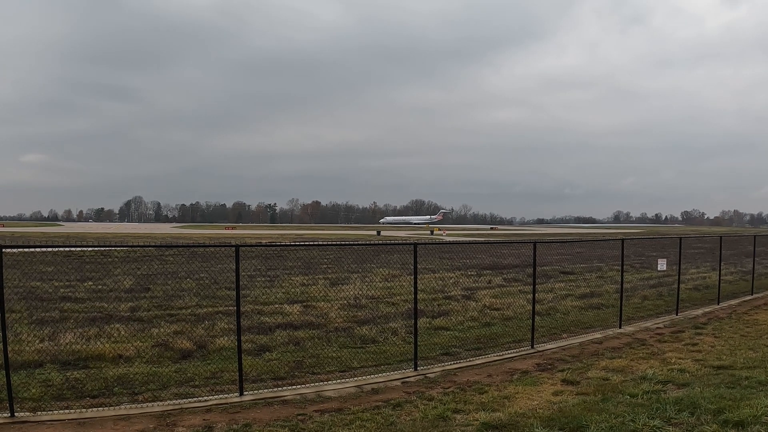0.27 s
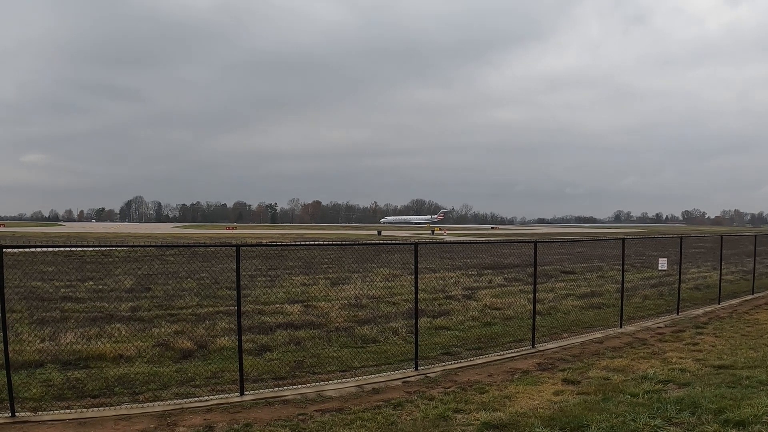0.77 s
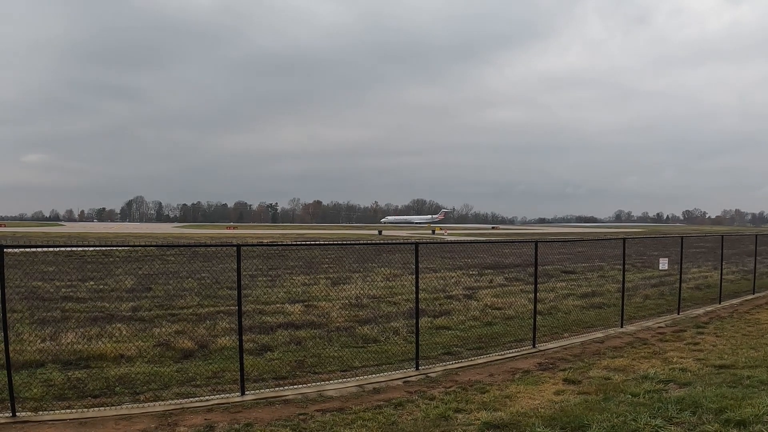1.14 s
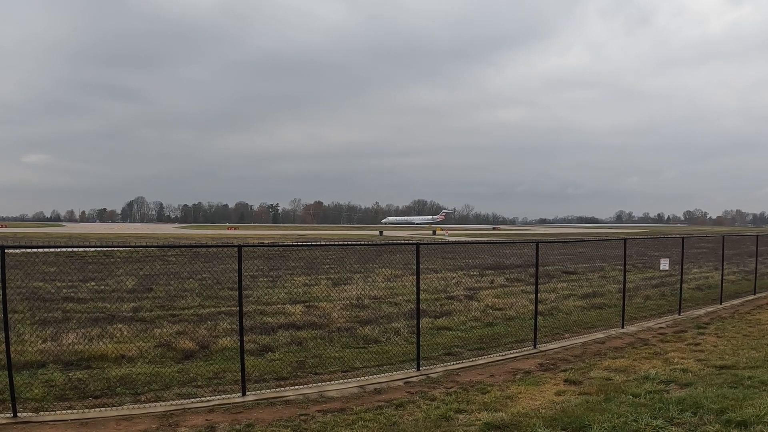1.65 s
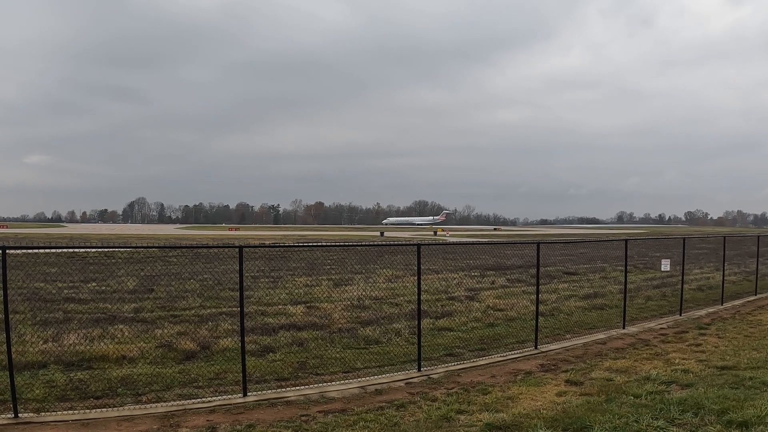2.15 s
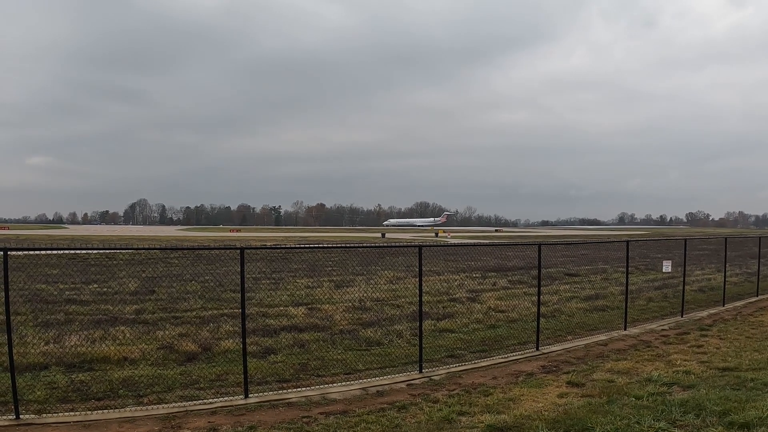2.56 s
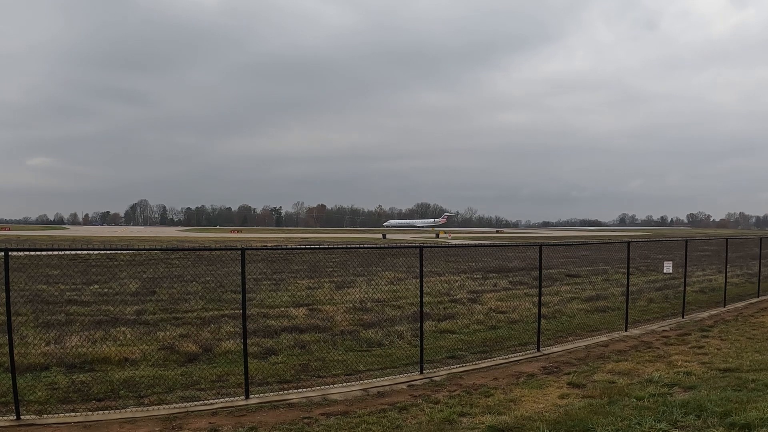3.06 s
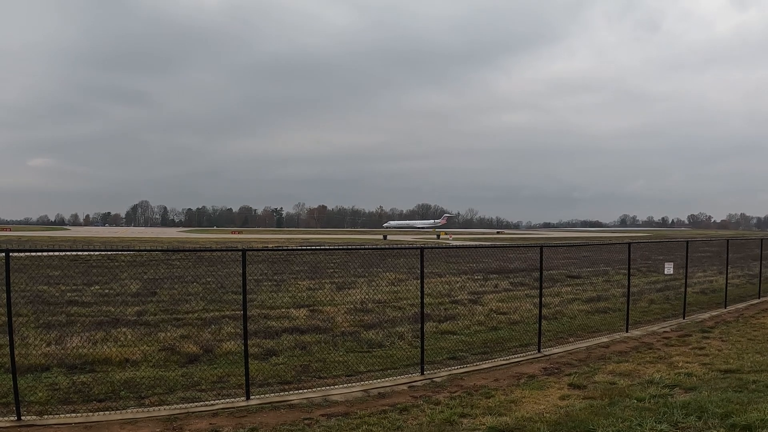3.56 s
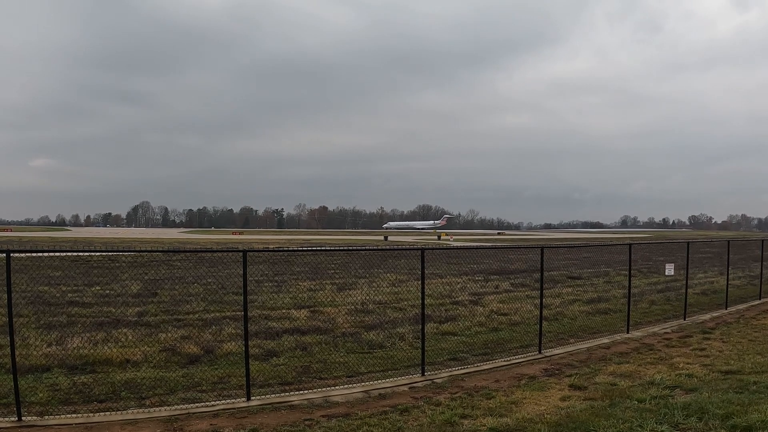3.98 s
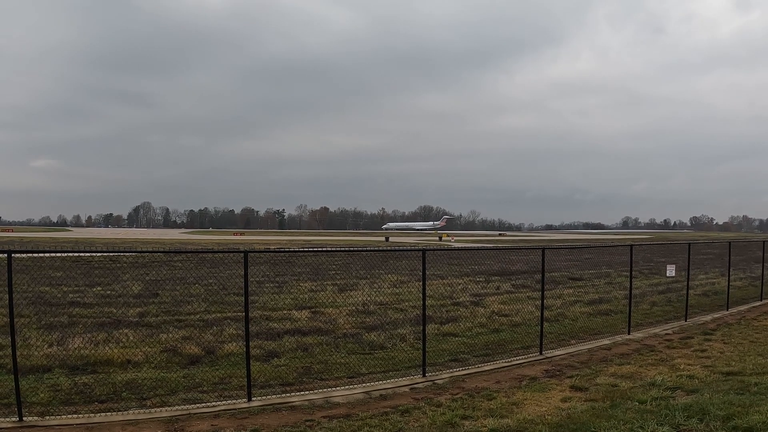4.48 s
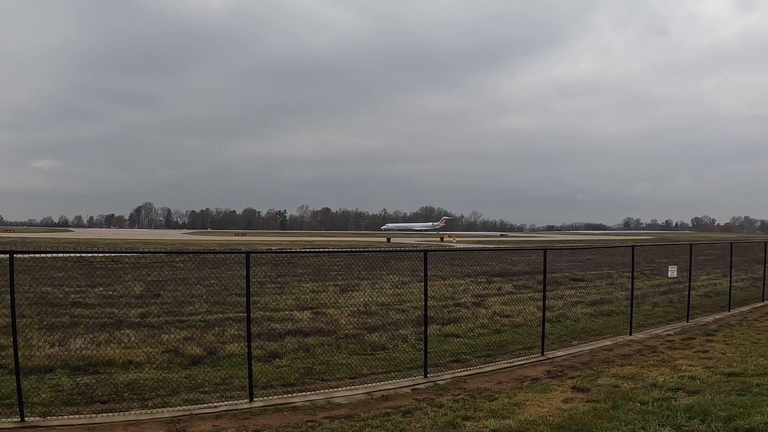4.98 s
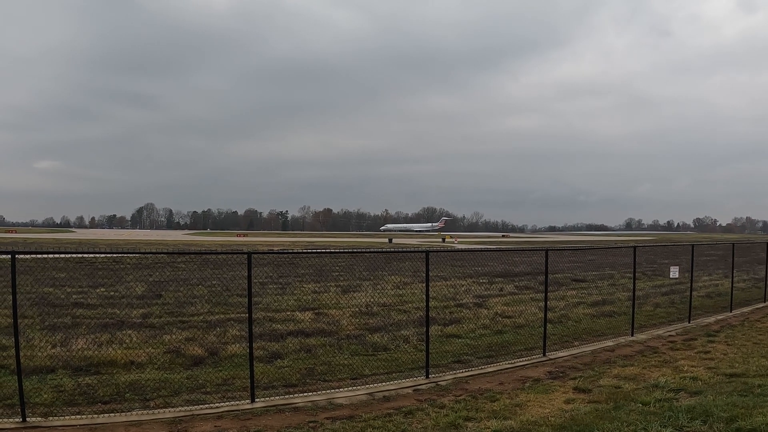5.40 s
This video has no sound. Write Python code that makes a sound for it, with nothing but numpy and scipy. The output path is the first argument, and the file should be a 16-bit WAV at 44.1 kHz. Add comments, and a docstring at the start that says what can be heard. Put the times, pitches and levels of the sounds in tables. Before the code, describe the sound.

A jet with two engines is heard from across an open field on a camera microphone in the wind. From 0 to about 2.6 seconds it idles: a fluttering, blurred whine near 1.3 kHz fades in and out over a low rumble, a broad airy rush, soft hiss and a hollow howl around 700 Hz, with a brief reedy sweep in the first half second. From about 2.7 seconds the engines spool up; the whine and its dull overtones glide upward, reaching about 2.2 kHz by 5.6, clearer and stronger, while a deep exhaust roar swells and a faint low drone rises late. Wind rumbles throughout, with soft thumps near 0.4, 0.7, 1.2, 3.9 and 4.3 seconds. After 5 seconds rough gusts batter the microphone, heavier on the right, and the near-mono image opens. It stops with engines still powering up, without any fly-past.

```python
"""Jet spooling up for takeoff

A twin-engine jet across a field goes from idle to takeoff power while wind buffets the camera microphone.
Fans: blurred harmonic lines on a rising pitch, fading in and out, over humps of wake noise.
Core, exhaust, airflow: whistle and howl, a growing low roar, shaped noise for jets, intakes and hiss.
Wind: low noise and short eddies; the image is mono until a last gust opens it."""
import sys
import numpy as np
from scipy import signal
from scipy.fft import rfft, irfft, next_fast_len
from scipy.io import wavfile
from scipy.ndimage import uniform_filter1d, map_coordinates

SR = 44100
rng = np.random.default_rng(int(sys.argv[2]) if len(sys.argv) > 2 else 0)


def bounce(signal):
    """Save signal as a 16-bit WAV file at the path given by the first command-line argument."""
    frames = np.transpose(np.atleast_2d(signal))
    limited = np.clip(frames, -1, 1)
    pcm = np.round(limited * 32767).astype(np.int16)
    wavfile.write(sys.argv[1], SR, pcm)


N = 248724


def amp(db):
    """Decibels to gain."""
    return 10 ** (np.asarray(db) / 20)


def unit(x):
    """Scale to rms 1."""
    return x / np.sqrt(np.mean(np.abs(x) ** 2) + 1e-20)


def along(points, hz):
    """Read (frequency, value) points on a log-frequency axis."""
    point_hz, values = np.transpose(points)
    return np.interp(np.log(hz + 1), np.log(point_hz + 1), values)


def curves(rows):
    """One value per sample for each column after the time."""
    times_s, *columns = np.transpose(rows)
    t_s = np.arange(N) / SR
    return [np.interp(t_s, times_s, column) for column in columns]


def wobble(knots_per_s):
    """Smooth random curve through normally distributed knots."""
    knots = rng.standard_normal(int(N * knots_per_s / SR) + 4)
    return map_coordinates(knots, [np.arange(N) * knots_per_s / SR])


def bell(time_s, length_s):
    """Smooth rise and fall of height 1 around a time."""
    return np.exp(-((np.arange(N) / SR - time_s) / length_s) ** 2)


def filtered(x, response):
    """Apply a response of frequency in the spectrum, zero-padded."""
    m = next_fast_len(N + SR // 2)
    return irfft(rfft(x, m) * response(np.fft.rfftfreq(m, 1 / SR)), m)[..., :N]


def rush(spectrum, patchy_db):
    """Coloured noise of rms 1; turbulent air gives it patches of random gain in time and frequency."""
    z = signal.stft(rng.standard_normal(N), nperseg=1024)[2]
    field = uniform_filter1d(rng.standard_normal(z.shape), size=12, axis=0)
    field = uniform_filter1d(field, size=10, axis=1)
    patchy = signal.istft(z * amp(patchy_db * unit(field)), nperseg=1024)[1][:N]
    return unit(filtered(patchy, lambda hz: amp(along(spectrum, hz))))


def steadied(x, span_s):
    """Noise with its own swells slower than the span evened out."""
    mean_square = uniform_filter1d(x ** 2, int(span_s * SR))
    mean_square = uniform_filter1d(mean_square, size=256)
    return x / np.sqrt(np.abs(mean_square) + 1e-9)


def tone(hz):
    """Sine of rms 1 on a moving pitch, random start phase."""
    return np.sqrt(2) * np.sin(2 * np.pi * (np.cumsum(hz) / SR + rng.random()))


def haystack(hz, width_hz):
    """Narrow hump of noise, rms 1: two low-passed noises modulate a moving carrier in quadrature."""
    a, b = filtered(rng.standard_normal((2, N)), lambda f: 1 / (1 + (f / width_hz) ** 2))
    phase = 2 * np.pi * np.cumsum(hz * np.ones(N)) / SR
    return unit(a * np.cos(phase) + b * np.sin(phase))


FLUTTER_DB, FLUTTER_KNOTS_PER_S = 1.3, 55


def blade_tone(hz, scatter, width_hz):
    """Fluttering line that turbulence blurs into a narrow skirt; loudness stays even."""
    share = np.clip(scatter, 0, 1)
    direct = tone(hz) * unit(amp(FLUTTER_DB * wobble(FLUTTER_KNOTS_PER_S)))
    blurred = haystack(hz, width_hz)
    return steadied(np.sqrt(1 - share) * direct + np.sqrt(share) * blurred, span_s=.06)


# breeze strength before gustiness: (time [s], level [dB])
BREEZE_LEVEL = [(0, -29), (.12, -28), (.22, -32), (.31, -24.5), (.4, -20.5), (.5, -33), (.59, -25.5),
                (.72, -29), (.83, -34), (.95, -30.5), (1.07, -33.5), (1.27, -30), (1.37, -34), (1.8, -32.5),
                (2.3, -37), (2.58, -34), (2.72, -27.5), (2.87, -27.5), (2.97, -34), (3.22, -31),
                (3.45, -38), (3.65, -28.5), (3.82, -41), (3.93, -28), (4.03, -33), (4.25, -28), (4.66, -27),
                (4.78, -31), (5.0, -24), (5.17, -26), (5.3, -19), (5.43, -20), (5.52, -23.5), (5.64, -20.5)]
# rough upper edge of the buffeting, sharper in gusts: (time [s], level [dB])
EDGE_LEVEL = [(0, -47), (.2, -54), (.37, -40), (.5, -46), (.8, -50), (1.05, -52), (1.17, -42), (1.3, -51),
              (2.25, -62), (2.9, -51.5), (3.7, -53), (4.35, -48.5), (4.9, -47.5), (5.18, -45.5),
              (5.45, -43.5), (5.64, -45)]
# relative spectra of rumble, upper edge and hollow gust thud: (frequency [Hz], density [dB per Hz])
RUMBLE_SPECTRUM = [(4, -4), (15, 1), (25, 2.5), (55, 4), (68, -2.5), (85, -4), (140, -12), (400, -101)]
EDGE_SPECTRUM = [(150, -12), (200, 4.5), (240, -1.5), (285, -2.5), (340, -6.5), (420, -13), (700, -44),
                 (2000, -120)]
THUD_SPECTRUM = [(50, -23.5), (85, 1.5), (150, -3.5), (210, -6.5), (310, -28.5), (700, -80.5)]
GUSTINESS_DB, GUST_KNOTS_PER_S = 1.56, 13  # quick random swings of the rumble
THUD_DB, THUD_DB_PER_EDGE_DB = -42, 1.34  # thud level at mean edge level, and its growth


def breeze():
    """Wind rumble common to both ports; gusts add a rough upper edge and a thud that grows faster still."""
    strength_db = curves(BREEZE_LEVEL)[0] + GUSTINESS_DB * wobble(GUST_KNOTS_PER_S)
    edge_db, = curves(EDGE_LEVEL)
    thud_db = THUD_DB + THUD_DB_PER_EDGE_DB * (edge_db - edge_db.mean())
    rumble = amp(strength_db) * steadied(rush(RUMBLE_SPECTRUM, patchy_db=0.2), span_s=.073)
    edge = amp(edge_db) * steadied(rush(EDGE_SPECTRUM, patchy_db=1.7), span_s=.12)
    thud = amp(thud_db) * steadied(rush(THUD_SPECTRUM, patchy_db=0.4), span_s=.14)
    return rumble + edge + thud


# last gust; scene() reads the opening:
# (time [s], extra buffeting at right port [dB], stereo opening [0-1])
LAST_GUST = [(4.7, -110, 0), (4.8, -62.5, 0.08), (5.05, -55, 0.5), (5.15, -36.5, 0.8), (5.36, -32, 1),
             (5.64, -34.5, 0.7)]
# single eddies striking the microphone:
# (time [s], level [dB], bell length [s], share reaching left port [0-1], rough puff re level [dB])
EDDY_STRIKES = [(.402, -27, .014, 1, -1), (.595, -30, .02, 1, -1), (.728, -24, .006, 1, -5),
                (1.168, -22.5, .014, 1, -2), (3.93, -33, .02, 1, -4), (4.345, -19, .004, 1, -18),
                (5.179, -25, .014, 0, 1), (5.34, -24, .0093, .4, -3), (5.404, -24, .012, 0, -1),
                (5.428, -21, .011, .6, -3), (5.606, -30, .012, 1, 5)]
# relative spectra of steady wind on a port and of an eddy's puff: (frequency [Hz], density [dB per Hz])
BUFFET_SPECTRUM = [(10, -5.5), (30, 4), (60, -5), (120, -6.5), (220, -18.5), (330, -17.5), (460, -29),
                   (700, -42.5), (1500, -73.5), (4000, -120)]
EDDY_SPECTRUM = [(10, -4), (40, -8), (90, -4), (150, 3), (210, 4.5), (260, -7), (330, -19), (460, -31),
                 (700, -36), (1500, -54), (4000, -120)]
PUSH_DB = 3  # slow pressure push of an eddy, re its level


def wind():
    """Breeze on both ports plus eddies, each a pressure push with a rough puff; last gust favours the right."""
    gust = amp(curves(LAST_GUST)[0]) * rush(BUFFET_SPECTRUM, patchy_db=0.5)
    shared = breeze()
    ports = np.array([shared, shared + gust])
    puff = steadied(rush(EDDY_SPECTRUM, patchy_db=2), span_s=.04)
    for time_s, level_db, length_s, left_share, puff_db in EDDY_STRIKES:
        pressure = amp(PUSH_DB) + amp(puff_db) * puff
        eddy = amp(level_db) * bell(time_s, length_s) * pressure
        ports += np.outer([np.clip(left_share, 0, 1), 1], eddy)
    return ports


# faint drones: (time [s], low drone pitch [Hz], low drone level [dB], high drone level [dB])
DRONE_TRACK = [(0, 446.9, -76.5, -72), (1.2, 447.6, -67.5, -62), (2.2, 451.9, -57.5, -59),
               (3, 452, -52.5, -58.5), (3.6, 450, -52, -62), (4.3, 454, -55, -58.5),
               (4.8, 472.2, -62, -64.5), (5.3, 547.7, -49.5, -68), (5.64, 572, -55, -81)]
# brief reedy sweep at idle: (time [s], pitch [Hz], level [dB])
REEDY_SWEEP = [(.05, 2600, -80), (.14, 2800, -61), (.2, 2550, -61), (.29, 2720, -56.5), (.34, 2900, -63),
               (.43, 2900, -66), (.6, 2950, -90)]


def drones():
    """Blurred low hum that rises near full power, thin steady tone above it, early reedy sweep."""
    low_hz, low_db, high_db = curves(DRONE_TRACK)
    sweep_hz, sweep_db = curves(REEDY_SWEEP)
    low = amp(low_db) * steadied(haystack(low_hz, width_hz=42), span_s=.2)
    high = amp(high_db) * blade_tone(np.full(N, 800), scatter=.2, width_hz=9)
    sweep = amp(sweep_db) * steadied(haystack(sweep_hz, width_hz=130), span_s=.06)
    return low + high + sweep


def power():
    """Engine power as the fan's fractional rise over idle speed: 0 at idle, about .7 at takeoff."""
    return np.clip(curves(FAN_PITCH)[0] / FAN_PITCH[0][1] - 1, 0, 1)


# relative exhaust spectra at power 0 and power 1: (frequency [Hz], density [dB per Hz])
IDLE_EXHAUST_SPECTRUM = [(45, -23.5), (75, 0), (95, -5.5), (120, 0), (150, 1.5), (195, -8.5), (250, -21),
                         (290, -21.5), (345, -34), (700, -92)]
FULL_EXHAUST_SPECTRUM = [(45, -16), (70, 3), (95, 3.5), (122, 1), (150, 1), (190, -16), (235, -22),
                         (275, -27), (330, -21), (400, -33), (700, -90.5)]
EXHAUST_IDLE_DB, EXHAUST_GROWTH_DB, EXHAUST_EXPONENT = -34.5, 15.5, 1.22  # growth times power ** exponent


def exhaust():
    """Large eddies in the jets roar along the ground, louder and deeper with power."""
    thrust = power()
    idle = np.sqrt(1 - thrust) * rush(IDLE_EXHAUST_SPECTRUM, patchy_db=0.0)
    full = np.sqrt(thrust) * rush(FULL_EXHAUST_SPECTRUM, patchy_db=0.9)
    level_db = EXHAUST_IDLE_DB + EXHAUST_GROWTH_DB * thrust ** EXHAUST_EXPONENT
    return amp(level_db) * steadied(idle + full, span_s=.08)


# broadband noise across the field, before layer gains:
# (time [s], jet mixing level [dB], intake level [dB], blade hiss level [dB])
RUSH_LEVELS = [(0.02, -49, -60.5, -66), (0.21, -47, -58, -66.5), (0.52, -44.5, -57, -64),
               (1.14, -47.5, -61.5, -66.5), (1.26, -47.5, -61.5, -68), (2.18, -48, -63.5, -67.5),
               (2.38, -48, -61.5, -65.5), (2.71, -48, -61.5, -67), (2.94, -46.5, -63.5, -65.5),
               (3.35, -45.5, -63, -68), (3.86, -47, -64, -64), (4.43, -49, -61, -63.5),
               (4.98, -45.5, -63, -61.5), (5.16, -46, -58.5, -58.5), (5.48, -45, -57.5, -64),
               (5.6, -45.5, -58, -61.5)]
# relative spectra: (frequency [Hz], density [dB per Hz])
MIXING_SPECTRUM = [(200, 1.5), (300, 1.5), (380, 1), (450, 1.5), (550, 2.5), (680, 2), (880, 1.5),
                   (1100, 0.5), (1350, -8.5), (1700, -11), (2600, -62.5)]
INTAKE_SPECTRUM = [(900, -17.5), (1400, 7.5), (1600, 2.7), (1900, 3.5), (2300, -0.8), (2550, -1.5),
                   (2850, 1), (3200, -5), (3800, -9), (5500, -65)]
HISS_SPECTRUM = [(2300, -23), (3200, 1.5), (3700, 2.5), (4200, 0.5), (5000, -4), (5600, -10), (6400, -15),
                 (7100, -22), (8000, -26), (8800, -31), (9600, -50.5), (13000, -57)]
MIXING_GAIN_DB, INTAKE_GAIN_DB, HISS_GAIN_DB = 0.5, 7.5, 7


def airflow():
    """Fine eddies of the jets, intake rush and blade hiss, as noise dulled by distance."""
    mixing_db, intake_db, hiss_db = curves(RUSH_LEVELS)
    hiss_db = hiss_db + 0.27 * wobble(7.2)
    mixing = amp(MIXING_GAIN_DB + mixing_db) * rush(MIXING_SPECTRUM, patchy_db=0.74)
    intake = amp(INTAKE_GAIN_DB + intake_db) * rush(INTAKE_SPECTRUM, patchy_db=0.98)
    hiss = amp(HISS_GAIN_DB + hiss_db) * rush(HISS_SPECTRUM, patchy_db=1.2)
    return mixing + intake + hiss


# hollow combustor howl: (time [s], pitch [Hz], level [dB])
HOWL_TRACK = [(0, 680, -61.5), (.62, 695, -48), (.9, 705, -50.5), (1.1, 710, -58), (1.5, 720, -54.5),
              (2.3, 745, -57), (3.1, 790, -55), (3.7, 810, -60.5), (4.2, 820, -56), (4.8, 1020, -65),
              (5.5, 1060, -54.5)]
# compressor whistle before fading: (time [s], pitch [Hz], level [dB])
WHISTLE_TRACK = [(2.58, 7462, -95), (3, 7670, -93), (3.25, 7790, -90), (3.6, 7880, -97), (4.1, 8000, -96),
                 (4.6, 8200, -104), (5.64, 8560, -102)]
HOWL_SCATTER, HOWL_WIDTH_HZ = .97, 46
WHISTLE_FADE_DB = 2.5  # slow random fading


def core():
    """Thin compressor whistle and breathy combustor howl, climbing with the throttle."""
    howl_hz, howl_db = curves(HOWL_TRACK)
    whistle_hz, whistle_db = curves(WHISTLE_TRACK)
    whistle_db = whistle_db + WHISTLE_FADE_DB * wobble(4)
    whistle = amp(whistle_db) * blade_tone(whistle_hz, scatter=.6, width_hz=18)
    howl = amp(howl_db) * blade_tone(howl_hz, HOWL_SCATTER, HOWL_WIDTH_HZ)
    return whistle + howl


# fan blade-passing rate, also read by power(): (time [s], pitch [Hz])
FAN_PITCH = [(0, 1284), (1, 1286), (2, 1289), (2.65, 1290), (3, 1351), (3.5, 1468), (4, 1590), (4.25, 1675),
             (4.5, 1791), (4.75, 1894), (5, 2015), (5.25, 2089), (5.45, 2130), (5.64, 2166)]
# blade tone carried by the moving air, before gain: (time [s], level [dB])
WHINE_LEVEL = [(0.0, -63.0), (0.1, -51.5), (0.2, -65.5), (0.22, -54.0), (0.36, -51.5), (0.52, -56.0),
               (0.57, -51.0), (0.62, -61.0), (0.66, -54.5), (0.92, -59.5), (0.99, -44.5), (1.03, -55.5),
               (1.07, -49.5), (1.13, -55), (1.2, -47.5), (1.24, -54), (1.3, -54.5), (1.37, -64.0),
               (1.45, -60.5), (1.5, -68.0), (1.54, -51.0), (1.68, -56.0), (1.79, -46.5), (1.83, -54.5),
               (1.88, -46.0), (1.94, -53.5), (1.97, -47.0), (2.09, -53.5), (2.14, -50.5), (2.28, -69.0),
               (2.32, -55.5), (2.55, -55), (2.6, -65), (2.7, -54), (2.87, -57), (2.95, -51.5),
               (2.99, -60.5), (3.13, -55.0), (3.19, -59.5), (3.43, -54.5), (3.71, -55.5), (3.9, -54.0),
               (4.05, -51.0), (4.09, -58.5), (4.14, -48.5), (4.22, -52.5), (4.28, -65.5), (4.39, -61.0),
               (4.46, -68.0), (4.56, -51.0), (4.64, -62.0), (4.69, -52), (4.76, -55), (4.85, -47.5),
               (4.91, -55), (4.95, -46.5), (4.98, -52), (5.02, -44), (5.08, -60), (5.12, -60), (5.16, -44),
               (5.2, -48.5), (5.26, -44.5), (5.37, -48.5), (5.5, -44.0), (5.63, -55.5)]
# its octave, before air loss and fading: (time [s], level [dB])
OCTAVE_LEVEL = [(0.0, -67.0), (0.15, -73.5), (0.18, -61.5), (0.28, -61.5), (0.33, -72.5), (0.5, -58.5),
                (0.54, -69.5), (1.17, -69.5), (1.96, -76.0), (2.25, -66.0), (2.59, -76.5), (2.64, -67.0),
                (2.94, -72.0), (3.0, -61.5), (3.24, -64.5), (3.62, -60.0), (4.01, -61.0), (4.05, -68.0),
                (4.11, -57.5), (4.2, -53.0), (4.25, -65.5), (4.56, -58.5), (4.62, -65.0), (4.82, -58.0),
                (5.04, -64.0), (5.12, -53.5), (5.23, -55.5), (5.33, -68.0), (5.41, -56.0), (5.46, -54.5),
                (5.5, -65.0), (5.63, -58.5)]
# higher harmonics, before air loss and fading: (time [s], third level [dB], fourth level [dB])
OVERTONE_LEVELS = [(0, -59.5, -73), (.25, -66, -73), (.5, -63.5, -74), (.8, -61, -74), (1, -68, -74),
                   (1.12, -62.5, -75), (1.26, -71, -76), (1.4, -62, -76), (1.62, -65.5, -76),
                   (1.78, -61.5, -76), (2, -68, -77), (2.28, -69, -72), (2.42, -62.5, -72), (3.1, -64, -69),
                   (3.38, -72, -70.5), (3.55, -68, -71), (3.88, -60.5, -70), (4.02, -67, -72),
                   (4.17, -64.5, -69), (4.3, -68, -68), (4.5, -69, -69), (5, -63, -71), (5.14, -68, -73),
                   (5.64, -64, -74)]
# turbulent blur of the overtones: (harmonic number, scattered share [0-1], skirt width [Hz])
OVERTONE_SKIRTS = [(2, .7, 34), (3, .9, 46), (4, .92, 55)]
WHINE_GAIN_DB = .6
IDLE_SCATTER, FULL_SCATTER = .55, .1  # scattered share of the whine at idle and at peak power
DULL_ABOVE_HZ, DULL_DB_PER_KHZ = 4680, 7.5  # distance swallows the higher tones
OVERTONE_FADE_DB, OVERTONE_FADE_KNOTS_PER_S = .7, 14
WAKE_DB, WAKE_DB_PER_POWER, WAKE_FADING = -60, 4.5, .35  # fading: share of the whine's


def fans():
    """Blade-passing whine, overtones that dull as they climb, broad humps of wake noise."""
    hz = curves(FAN_PITCH)[0] * (1 + .002 * wobble(25))
    thrust = power()
    scatter = IDLE_SCATTER + (FULL_SCATTER - IDLE_SCATTER) * thrust / thrust.max()
    whine_db, = curves(WHINE_LEVEL)
    tones = amp(WHINE_GAIN_DB + whine_db) * blade_tone(hz, scatter, width_hz=24)

    carried = curves(OCTAVE_LEVEL) + curves(OVERTONE_LEVELS)  # list: one level curve per harmonic
    for (harmonic, share, skirt_hz), carried_db in zip(OVERTONE_SKIRTS, carried):
        overtone_hz = harmonic * hz
        air_loss_db = DULL_DB_PER_KHZ * np.maximum(overtone_hz - DULL_ABOVE_HZ, 0) / 1000
        fade_db = OVERTONE_FADE_DB * wobble(OVERTONE_FADE_KNOTS_PER_S)
        level_db = carried_db - air_loss_db + fade_db
        tones += amp(level_db) * blade_tone(overtone_hz, share, skirt_hz)

    wake_db = WAKE_DB + WAKE_DB_PER_POWER * thrust + WAKE_FADING * (whine_db - whine_db.mean())
    wakes = amp(wake_db) * haystack(hz, width_hz=170)
    wakes += amp(-69.5 + 18.8 * thrust) * haystack(1.95 * hz, width_hz=190)
    return tones + wakes


# stereo width when fully open: (frequency [Hz], side re mid [dB])
STEREO_WIDTH = [(100, -45.5), (600, -26), (1000, -20), (1500, -17), (2150, -14.5), (3300, -33.5),
                (8000, -14.5)]


def scene():
    """Distant jet ahead, plus wind; as the image opens, a quarter-turn side signal makes the right port lead."""
    jet = drones() + exhaust() + airflow() + core() + fans()
    opening = np.clip(curves(LAST_GUST)[1], 0, 1)
    side = opening * filtered(jet, lambda hz: -1j * amp(along(STEREO_WIDTH, hz)))
    return wind() + np.array([jet + side, jet - side])


TOP_HZ = 13500


def record(dry):
    """The camera keeps nothing above its band limit."""
    return filtered(dry, lambda hz: hz < TOP_HZ)


dry = scene()
out = record(dry)
bounce(out)
```